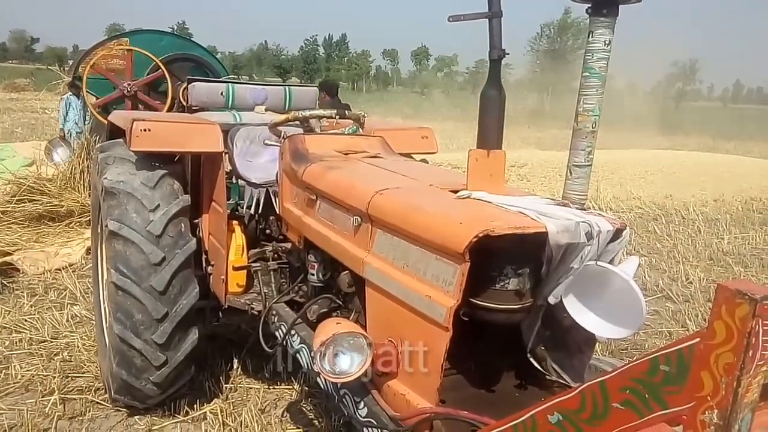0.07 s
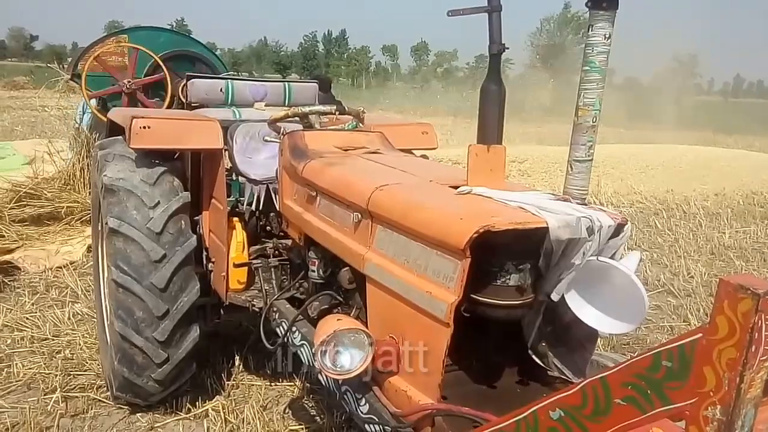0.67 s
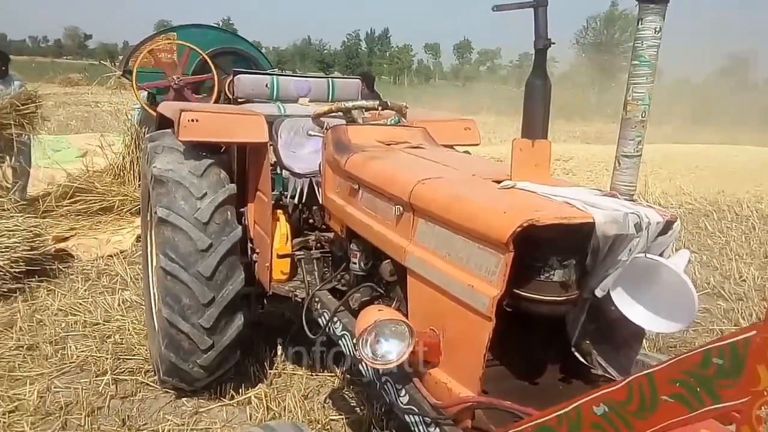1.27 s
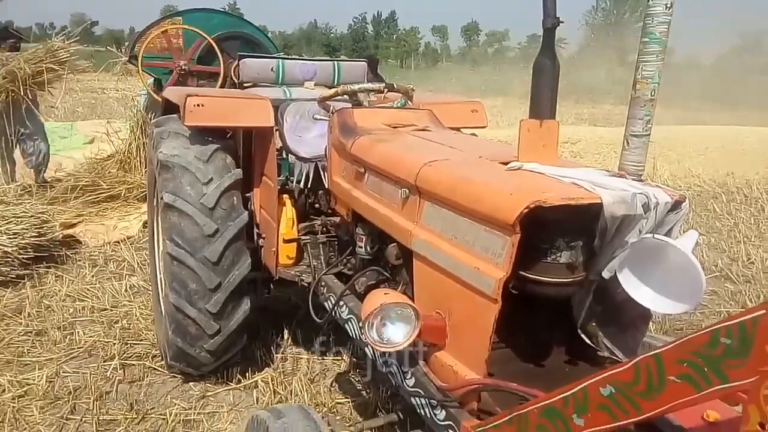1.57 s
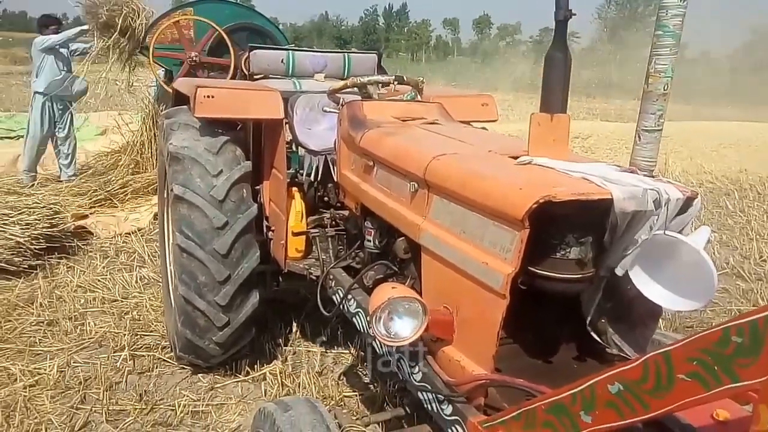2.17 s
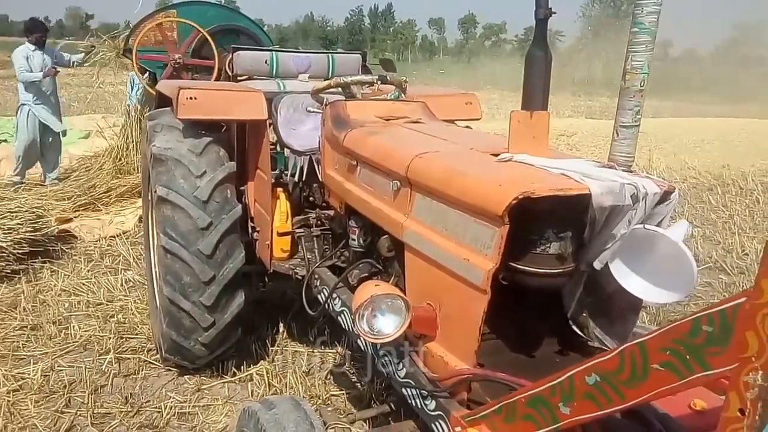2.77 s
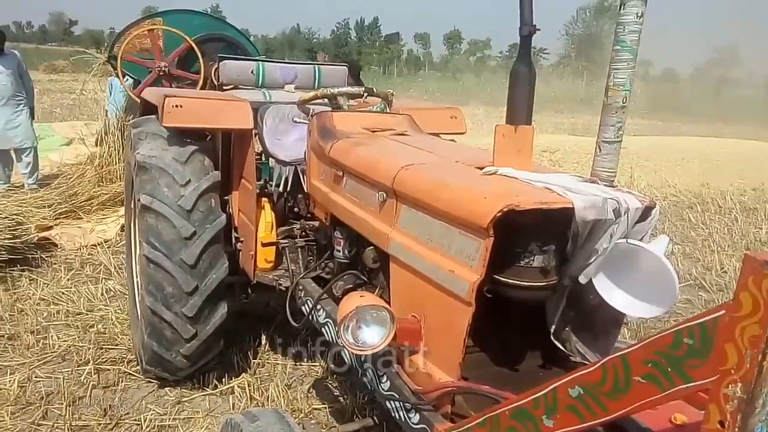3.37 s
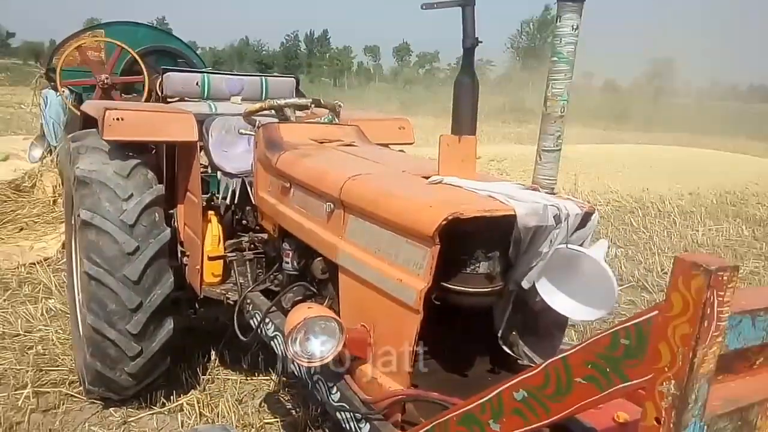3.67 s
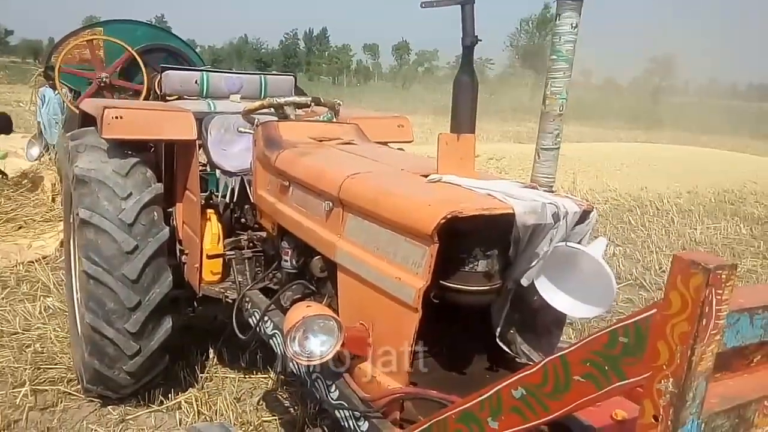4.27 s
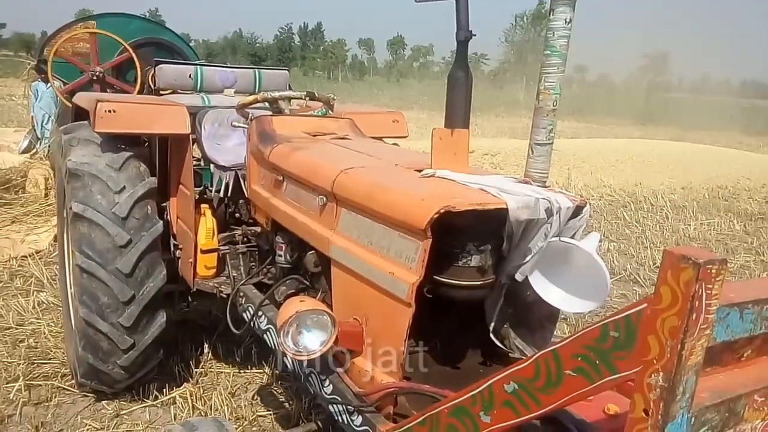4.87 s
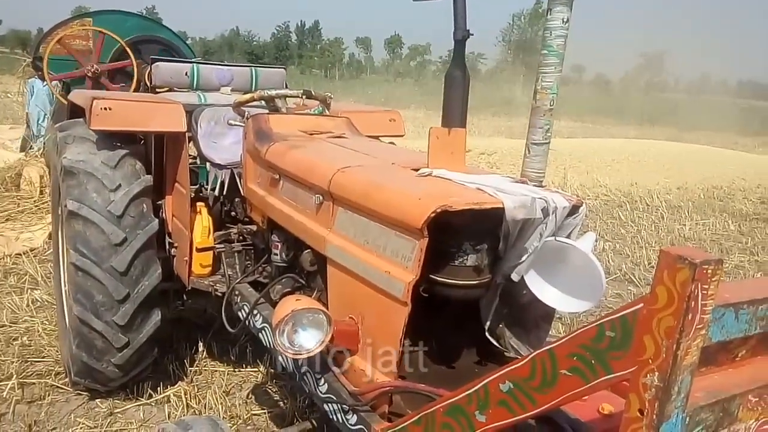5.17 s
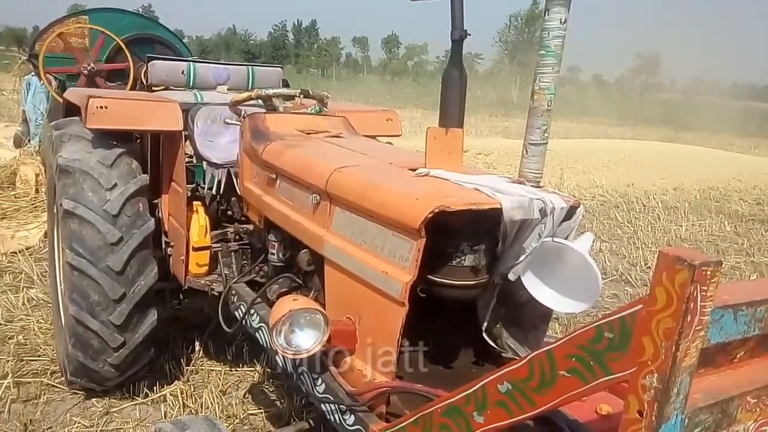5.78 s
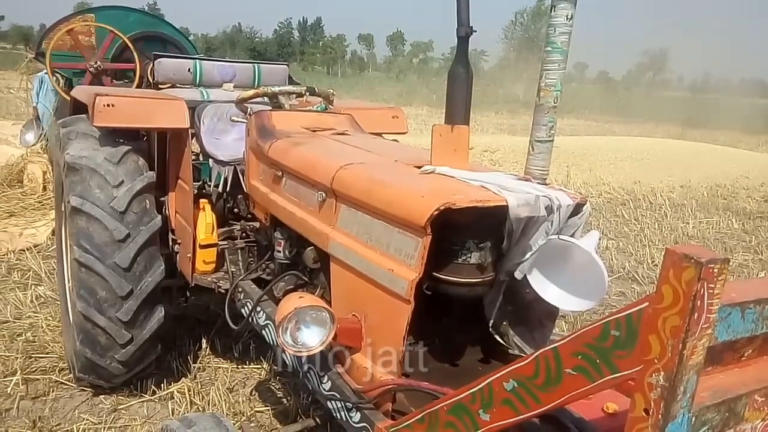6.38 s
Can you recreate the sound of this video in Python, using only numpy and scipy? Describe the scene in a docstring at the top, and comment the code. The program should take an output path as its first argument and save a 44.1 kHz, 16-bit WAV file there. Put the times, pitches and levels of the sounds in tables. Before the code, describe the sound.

Steady diesel engine beats and metallic knocking mix with a roaring thresher, broken by a short silence before fading back in.

```python
"""Exhaust beats throb against a thresher's drum: a three-cylinder diesel tractor drives it by a belt,
a couple of metres from the microphone in an open field. Gears whine, knocks repeat with every engine cycle,
air and straw roar, gas hisses. Each sheaf drags the speed down; panels sing as it creeps back through
their resonances. The microphone turns aside and back; later the sound cuts off once and fades in again."""
import sys
import numpy as np
from scipy import signal
from scipy.fft import rfft, irfft
from scipy.io import wavfile
from scipy.ndimage import uniform_filter1d

SR = 44100
rng = np.random.default_rng(int(sys.argv[2]) if len(sys.argv) > 2 else 0)


def log_audio(samples):
    """Write samples as a 16-bit WAV file to the path given in sys.argv[1]."""
    # one column per channel
    frames = np.atleast_2d(samples).T
    # limit to full scale, then quantise
    limited = np.clip(frames, -1, 1)
    pcm = np.round(limited * 32767).astype(np.int16)
    wavfile.write(sys.argv[1], SR, pcm)


N = 291492
TIME = np.arange(N) / SR


def undb(db):
    """Decibels to gain."""
    return 10 ** (np.asarray(db) / 20)


def level(x, db):
    """Scale to an rms level."""
    return x * undb(db) / np.sqrt(np.mean(x ** 2))


def walk(rate_hz):
    """Random levels held 1 / rate_hz seconds and smoothed twice; spread near 1."""
    hold = max(int(SR / rate_hz), 1)
    steps = np.repeat(rng.standard_normal(N // hold + 1), hold)
    return uniform_filter1d(uniform_filter1d(steps, hold), hold)[:N]


def ease(start_s, length_s):
    """Smooth rise from 0 to 1."""
    return np.sin(np.pi / 2 * np.clip((TIME - start_s) / length_s, 0, 1)) ** 2


def colour(x, points, size=8192):
    """Minimum-phase filter through (frequency_hz, gain_db) points."""
    hz, db = np.transpose(points)
    grid_hz = np.maximum(np.arange(size // 2 + 1) * SR / size, 1)
    response = undb(np.interp(np.log(grid_hz), np.log(hz), db))
    cepstrum = irfft(np.log(response))
    cepstrum[1:size // 2] *= 2
    cepstrum[size // 2 + 1:] = 0
    return signal.fftconvolve(x, irfft(np.exp(rfft(cepstrum))))[:N]


def ring(x, modes):
    """Sum of (pitch_hz, width_hz, level_db) resonances; each filters twice, for steep skirts."""
    out = 0
    for hz, width, db in modes:
        b, a = signal.iirpeak(hz, hz / (width * np.sqrt(2)), SR)
        out = out + level(signal.lfilter(b, a, signal.lfilter(b, a, x)), db)
    return out


def pulses(turns):
    """One click at each whole turn."""
    return 1. * (np.diff(np.floor(turns), prepend=np.floor(turns[0])) == 1)


def beats(turns, harmonics_db):
    """One smooth pressure pulse per turn, with the given harmonic levels."""
    harmonics = (undb(db) * np.cos(2 * np.pi * k * turns) for k, db in enumerate(harmonics_db, 1))
    return -np.sqrt(2) * sum(harmonics)


FREE_FIRING_HZ, BITE_S = 51.369, .945  # speed with an empty drum; time to draw a sheaf in
# Sheaves fed to the drum, the first already in as we start listening: start_s, speed_lost_hz
SHEAVES = [(-2.048, 3.851), (2.8, 3.57)]

def engine_speed(recover_s=3.718):
    """Firings per second: each sheaf drags the engine down, and it slowly pulls the drum back up."""
    sag_hz = sum(lost_hz * ease(start, BITE_S) * np.exp(-((TIME - start) / recover_s) ** 2)
                 for start, lost_hz in SHEAVES)
    return FREE_FIRING_HZ - sag_hz


def straw_load(hold_s=1.73, clear_s=1.0):
    """How full the drum is (0-1): a sheaf is drawn in, threshed and blown out."""
    return sum(ease(start, BITE_S) - ease(start + hold_s, clear_s) for start, _ in SHEAVES)


def in_tune(firing_hz, pitch_hz):
    """1 when a harmonic of the firings sits on a resonance, -1 when it lies midway between two."""
    return np.cos(2 * np.pi * pitch_hz / firing_hz)


# The exhaust stack from a couple of metres, harmonics 1, 2, ...: level_db
EXHAUST_HARMONICS = [-31, -17, -16, -24, -38, -32, -30, -36.5]

def exhaust(firings, scatter_db=.5, stagger_turns=.0051, lag_turns=.87):
    """The stack beats once per firing, each beat a little different in size and timing."""
    turns = firings - lag_turns + stagger_turns * walk(49)
    return beats(turns, EXHAUST_HARMONICS) * undb(scatter_db * walk(49))


# Thresher drum, chaff blower and radiator fan across the open ground, harmonics 1, 2, ...: level_db
DRUM_HARMONICS = [-66, -35.5, -36.5, -24, -36.5, -26, -41.5, -38.5]
BLOWER_HARMONICS = [-37.5, -30.5]
FAN_HARMONICS = [-25.5, -34.5]

def rotors(firings, drum_ratio=.9324, blower_ratio=2.218, fan_ratio=3.8375, slip_turns=.022):
    """Drum, blower and fan follow the engine through their belts; ratios are blade passes per firing."""
    # the drum's beaters alternate strong and weak, so its pattern spans two passes
    drum = beats((drum_ratio * firings - .86) / 2, DRUM_HARMONICS)
    blower = beats(blower_ratio * firings + slip_turns * walk(5.6), BLOWER_HARMONICS)
    fan = beats(fan_ratio * firings + slip_turns * walk(2.8), FAN_HARMONICS)
    return drum + blower + fan


# Resonances of the tractor's gear case: pitch_hz, width_hz, level_db
GEAR_CASE_MODES = [(1278, 16, -24), (1314, 12, -32), (2505, 22, -34)]

def gears(firings, main_ratio=26, pump_ratio=22 / 3, hum_db=-26.5, waver_db=1.05):
    """The main gear whines through its case, the pump gear hums; ratios are tooth passes per firing."""
    mesh = beats(main_ratio * firings, [0, 0])  # two equal harmonics
    whine = ring(mesh, GEAR_CASE_MODES) * undb(waver_db * walk(25))
    hum = beats(pump_ratio * firings, [hum_db]) * undb(waver_db * walk(22))
    return whine + hum


# Resonances of the bonnet panels: pitch_hz, width_hz, level_db
BONNET_MODES = [(958, 16, -35), (1010, 13, -31)]

def bonnet(firings, waver_db=1):
    """Every firing shakes the bonnet, which sings when an engine harmonic slides into a resonance."""
    return ring(pulses(firings), BONNET_MODES) * undb(waver_db * walk(12))


# Resonances of the engine block and pipes: pitch_hz, width_hz, level_db
BLOCK_MODES = [(345, 24, -31.5), (462, 14, -34.5), (500, 14, -33), (718, 35, -33), (1125, 6, -29),
               (1225, 30, -35), (1420, 14, -35), (1625, 60, -34), (2670, 50, -35), (3000, 60, -34)]
# The injection pump's ring, before its swell: pitch_hz, width_hz, level_db
PUMP_MODES = [(846, 18, -23.5)]

def block_and_pump(firings, accent_db=1.5, tune_hz=841, swing_db=2.2):
    """One hard stroke per cycle rings block and pump; every injection also taps the pump lightly."""
    strokes = pulses(firings / 3 - 1 / 4) * undb(accent_db * walk(30))
    injections = strokes + .084 * pulses(firings - 3 / 4) * undb(accent_db * walk(30))
    swell_db = -.8 + swing_db * in_tune(engine_speed(), tune_hz)
    return ring(strokes, BLOCK_MODES) + ring(injections, PUMP_MODES) * undb(swell_db)


# Tone of the engine's knocks at the microphone: frequency_hz, gain_db
KNOCK_SPECTRUM = [(50, -22), (110, -1.5), (180, -2), (235, -7), (310, 2), (420, -6), (610, -7.5), (900, -2),
                  (1100, -9), (1330, -7), (1550, -14), (2900, -12.5), (3700, -24), (6500, -22.5),
                  (9000, -36.5)]

def clatter(firings, count=36, spread_db=4, scatter_db=1.5, jitter_firings=.00099, tail_s=.00067, db=-17):
    """Valves, injectors and gears knock at the same crank angles in every cycle of three firings."""
    knocks = np.zeros(N)
    for angle, size in zip(rng.random(count), rng.standard_normal(count)):
        at = np.flatnonzero(pulses(firings / 3 - angle))
        late, weakness = rng.standard_normal((len(at), 2)).T
        delay = np.round(late * jitter_firings * SR / FREE_FIRING_HZ).astype(int)
        at = np.clip(at + delay, 0, N - 1)
        knocks[at] += rng.choice([-1, 1]) * undb(spread_db * size - scatter_db * weakness)
    # the casting smears each knock over a few milliseconds
    tail = rng.standard_normal(SR // 20) * np.exp(-TIME[:SR // 20] / tail_s)
    smear = undb(-2) * signal.fftconvolve(knocks, tail / np.linalg.norm(tail))[:N]
    return level(colour(knocks + smear, KNOCK_SPECTRUM), db)


# Tone of the roar, with the recorder's treble drop near 6.6 kHz: frequency_hz, gain_db
ROAR_SPECTRUM = [(20, -15.5), (70, -6.5), (120, 0.5), (190, 1.5), (290, 3.5), (400, 2.5), (600, -0.7),
                 (950, 1.5), (1300, -1.5), (1550, -4), (3000, -4.5), (3700, -9.5), (6550, -11),
                 (6750, -13.5), (8000, -25.5), (15500, -31)]

def roar(flicker_db=1.4, db=-15):
    """Air and straw tear through the fans and the drum without a pause."""
    turbulence = rng.standard_normal(N) * undb(flicker_db * walk(150))
    return level(colour(turbulence, ROAR_SPECTRUM), db)


def howl(firing_hz, pitch_hz=960, width_hz=170, tune_hz=963, swing_db=4.5, flicker_db=2, base_db=-28):
    """Air and straw sound the drum housing's broad resonance; it swells as a firing harmonic meets it."""
    housing = ring(rng.standard_normal(N), [(pitch_hz, width_hz, base_db)])
    return housing * undb(flicker_db * walk(24) + swing_db * in_tune(firing_hz, tune_hz))


# Gas bursts of the three cylinders and one lesser puff: centre_firings, width_firings, gain_db
GAS_BURSTS = [(.76, 0.2, 0.4), (1.7, .24, -0.7), (2.3, 0.092, -6), (2.76, .22, 0.5)]
# Tone of the hiss, with the recorder's treble drop near 6.6 kHz: frequency_hz, gain_db
GAS_SPECTRUM = [(60, -21.5), (200, 0.5), (350, 8), (600, 1.5), (1500, -1), (3000, -1), (3700, -3.5),
                (5300, -2.5), (6550, -1.5), (6750, -6), (7800, -10.5), (9700, -12), (11000, -16.5),
                (15500, -22.5)]

def gas_rush(firings, scatter_db=.6, spurts_per_s=1600, spurt_s=.0016, spurt_db=3, base_db=-19):
    """Turbulent gas hisses in bursts locked to the engine cycle, quick to open and slower to die."""
    gate = 0
    for centre, width, burst_db in GAS_BURSTS:
        from_centre = (firings - centre + 1.5) % 3 - 1.5
        side_width = width * np.where(from_centre < 0, .76, 1)
        gate = gate + undb(burst_db) * np.exp(-.5 * (from_centre / side_width) ** 2)
    # each burst is made of tiny spurts that start abruptly and die away
    spurts = (rng.random(N) < spurts_per_s / SR) * undb(spurt_db * rng.standard_normal(N)) ** 2
    sputter = np.sqrt(signal.lfilter([1], [1, -np.exp(-1 / (spurt_s * SR))], spurts))
    gas = gate * undb(scatter_db * walk(60)) * sputter * rng.standard_normal(N)
    return level(colour(gas, GAS_SPECTRUM), base_db)


def microphone_turn(away_s=1.2, back_s=3.1, turn_s=.45):
    """0 with the microphone facing the engine, 1 while it points aside."""
    return ease(away_s, turn_s) - ease(back_s, turn_s)


CUT_S, RESUME_S = 3.509, 4.078  # the silent gap


def scene(load_hiss_db=2, aside_hiss_db=.9, aside_knock_db=-2):
    """One crankshaft drives everything; the straw in the drum sets its speed and effort."""
    firing_hz = engine_speed()
    firings = np.cumsum(firing_hz) / SR
    resume = int(RESUME_S * SR)
    firings[resume:] -= firings[resume] + 1 / 7  # after the gap the crank is just short of a new cycle
    aside = microphone_turn()
    throb = exhaust(firings) + rotors(firings)
    singing = gears(firings) + bonnet(firings) + block_and_pump(firings)
    knocks = clatter(firings) * undb(aside_knock_db * aside)
    air = roar() + howl(firing_hz)
    hiss = gas_rush(firings) * undb(load_hiss_db * straw_load() + aside_hiss_db * aside)
    return (throb + singing + knocks + air + hiss)[None]


def record(dry, knee=8, fade_s=.26, fade_from=.12, top_hz=15700):
    """Peaks are squashed at full scale; a hard cut to silence, a short fade in, and a steep low-pass."""
    squashed = dry / (1 + np.abs(dry) ** knee) ** (1 / knee)
    rise = np.clip((TIME - RESUME_S) / fade_s, 0, 1) ** 1.18
    fader = (TIME < CUT_S) + (TIME >= RESUME_S) * (fade_from + (1 - fade_from) * rise)
    lowpass = signal.ellip(10, .1, 80, top_hz, fs=SR, output="sos")
    return signal.sosfilt(lowpass, squashed * fader)


dry = scene()
out = record(dry)
log_audio(out)
```